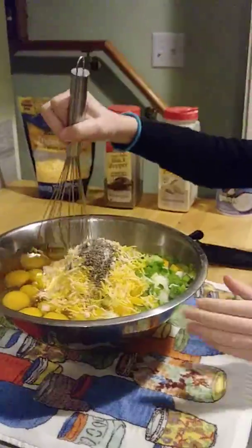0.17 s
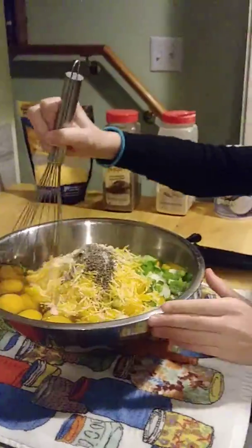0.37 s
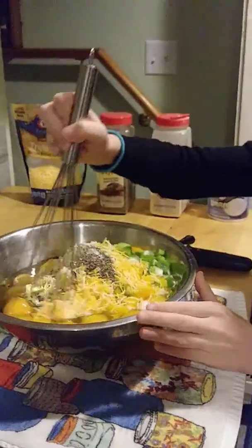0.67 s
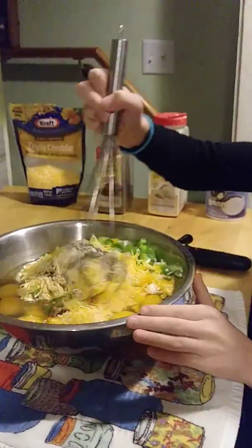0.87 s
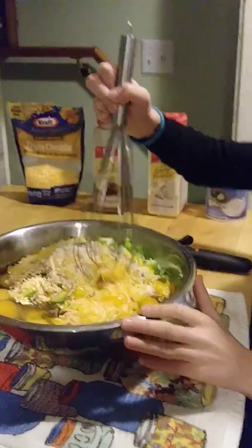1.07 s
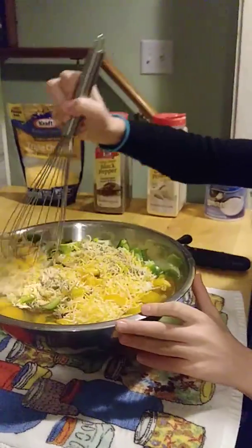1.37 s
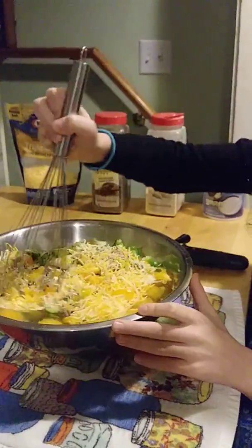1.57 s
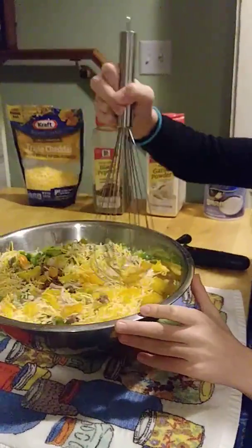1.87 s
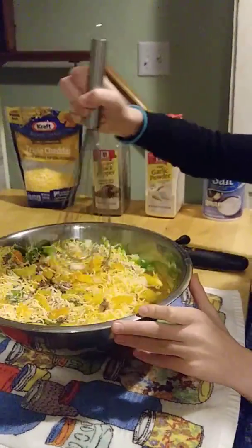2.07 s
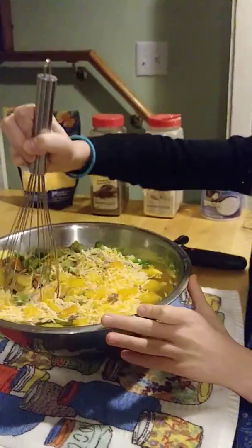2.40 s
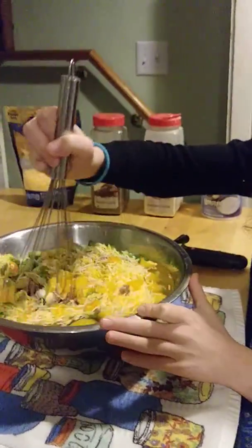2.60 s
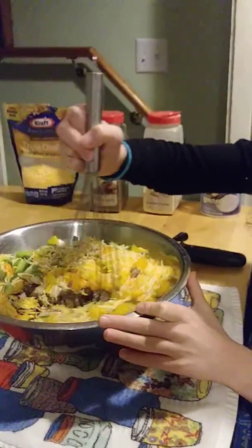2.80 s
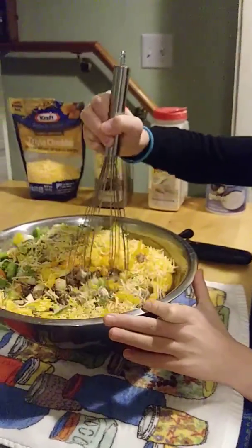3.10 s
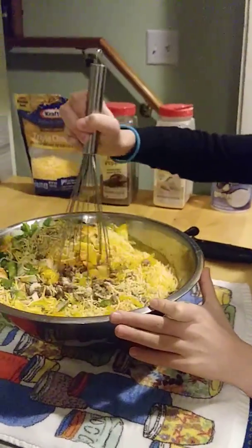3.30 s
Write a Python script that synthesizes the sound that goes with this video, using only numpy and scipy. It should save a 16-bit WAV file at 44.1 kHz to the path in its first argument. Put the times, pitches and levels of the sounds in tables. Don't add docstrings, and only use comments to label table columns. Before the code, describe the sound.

A wire whisk on a steel bowl, heard close in a small live kitchen. A metallic clatter dies within 0.2 s, then very faint wet swishes and rubs, a soft knock at 0.8 and a dull table bump at 1.54. Loud, short-ringing clanks with wire clicks hit at 2.27, 2.78 and 3.05, then crowd together from 3.27 to 3.45, flattened by limiting. Faint fridge hum beneath.

```python
import sys
import numpy as np
from scipy import signal
from scipy.fft import rfft, irfft
from scipy.io import wavfile
from scipy.ndimage import uniform_filter1d, minimum_filter1d

SR = 44100
rng = np.random.default_rng(int(sys.argv[2]) if len(sys.argv) > 2 else 0)


def wrap_up_sound(samples):
    columns = np.atleast_2d(samples).T
    tamed = np.clip(columns, -1, 1)
    steps = np.round(tamed * 32767).astype(np.int16)
    wavfile.write(sys.argv[1], SR, steps)


def ratio(d):
    e = np.asarray(d, float) / 20
    return 10 ** e


N = 152145


def evened(x):
    return x / np.sqrt(np.mean(x ** 2) + 1e-20)


def read(points, hz):
    f, value = np.transpose(points)
    return np.interp(np.log(hz + 1), np.log(f + 1), value)


def add(mix, s, sound):
    part = mix[max(round(s * SR), 0):][:len(sound)]
    part += sound[:len(part)]


def noise(size, gain_at, grain_db=0):
    grains = np.minimum(rng.exponential(1, 256), 4)
    lumps = ratio(grain_db * np.repeat(grains, 64))
    spectrum = rfft(rng.standard_normal(16384) * lumps)
    gain = gain_at(np.fft.rfftfreq(16384, 1 / SR))
    return evened(irfft(spectrum * gain))[:size]


def swell(length, rise):
    u = np.arange(0, length, 1 / SR) / length
    return np.sin(np.pi / 2 * np.minimum(u / rise, (1 - u) / (1 - rise))) ** 0.54


# (time [s], peak level [dB], spot on the bowl, time the wires land over [s])
STRIKES = [(2.27, 2.5, "far", .02), (2.276, -12.5, "far", 0.011), (2.298, -8, "far", .004),
           (2.784, 2.5, "near", .004), (2.794, -2, "near", .01), (2.819, -8.5, "edge", 0.0025),
           (3.0508, 2.5, "near", 0.0037), (3.0594, -3, "near", .01), (3.103, -3, "near", .004),
           (3.118, -13.5, "near", .006), (3.147, -14, "near", 0.0033), (3.2667, 3.5, "rim", .005),
           (3.273, -5, "rim", .01), (3.285, -1, "rim", .01), (3.3135, -2.5, "rim", 0.0033),
           (3.3185, 3.5, "edge", 0.0018), (3.329, -4, "rim", .003), (3.343, -1, "lip", 0.0044),
           (3.357, -9, "far", 0.0071), (3.368, -12.5, "near", 0.0041), (3.416, 5.5, "edge", 0.0018),
           (3.447, 0, "edge", 0.0013)]
# (frequency [Hz], level [dB], t60 [s])
FAR_WALL = [(445, -23.5, 0.11), (699.5, -10, 0.13), (810, -18, 0.078), (1030, -9, 0.059), (1213, -21, .08),
            (1812.4, -5, .16), (2020, -9, 0.11), (2137, -6, 0.092), (2560, -15.5, .1), (3440, 2.5, 0.047),
            (3967, -12, 0.064), (4300, -10.5, 0.081), (5460, -24, .08)]
NEAR_WALL = [(471, -29, 0.055), (801, -24.5, 0.086), (1220, -14.5, 0.064), (1283.7, 4, 0.051),
             (1785, -10, 0.03), (2166, -7.5, 0.13), (2592, -25, 0.16), (3400, -7, 0.079),
             (3890, -11.5, 0.14), (3937, -7, 0.21), (4110, -9.5, 0.11), (4550, -5.5, 0.06),
             (5174, -16, 0.041)]
RIM = [(669, -15, 0.23), (819, -15, 0.18), (1298, -0.5, 0.045), (1327, -7.5, 0.084), (1596, -9, 0.21),
       (2128, -5.5, 0.089), (2170, -4, 0.068), (3375, 2, 0.055), (3433, -1, .1), (4100, -1, 0.2),
       (4490, 3, 0.077)]
EDGE = [(1325, -9, 0.12), (1570, -12.5, 0.074), (2110, -1.5, 0.15), (3420, -13, 0.088), (3900, 4, 0.16),
        (4296, 10.5, 0.015), (4380, -16, 0.088), (5340, -22.5, .08)]
LIP = [(819, -16, 0.15), (1815, 5, 0.2), (2104, -7, 0.1), (2301, -10, .12), (3410, -9, .1),
       (3975, -12, 0.08)]
# (frequency [Hz], level [dB], t60 [s])
WIRES = [(6158, -14.5, 0.069), (7520, -22.5, 0.056), (8730, -28, 0.08), (11680, -32.5, 0.085),
         (13100, -35, .07), (13700, -42, 0.06), (14900, -41, .07)]
WAKES = {"far": [-9, -20, -9.5, -13.5, -5, -5, -13], "near": [-6.5, -9, -10, -8.5, -9.5, -9, -8], "rim":
         [-8.5, -4.5, -26, -8, -4, -4, -15], "edge": [-12.5, -9.5, -8.5, -5, -18.5, -9, -6.5], "lip":
         [-10.5, -20, -3.5, -11, -12, -9, -9]}
# (frequency [Hz], level [dB])
CRACK = [(60, -59), (550, -27), (700, -12.5), (1300, -6), (2650, -11), (4360, -2.5), (6000, -28.5),
         (10000, -50.5), (16000, -48)]
SPLIT, TWIN_DB = 0.0097, -7
WIRE_SPREAD_DB = 4
CONTACT_S = 0.00049
CRACK_DB, CRACK_T60_S = -1, 0.063
LATER_WIRES = 0.51


def strike(db, spot, spread_s):
    t = np.arange(SR // 3) / SR
    modes = {"far": FAR_WALL, "near": NEAR_WALL, "rim": RIM, "edge": EDGE, "lip": LIP}[spot]
    woken = [(hz, mode_db + wake_db + 6, t60) for (hz, mode_db, t60), wake_db in zip(WIRES, WAKES[spot])]
    ring = np.zeros(len(t))
    for (hz, mode_db, t60), chance in zip(modes + woken, rng.random((24, 5))):
        luck, low, high, low_phase, high_phase = chance
        twins = np.sin(2 * np.pi * (hz * (1 - SPLIT * low) * t + low_phase))
        twins += np.sin(2 * np.pi * (hz * (1 + SPLIT * high) * t + high_phase))
        decay = ratio(mode_db + WIRE_SPREAD_DB * (luck - .5) - 5.5 - 60 * t / t60)
        ring += decay * (np.sin(2 * np.pi * hz * t) + ratio(TWIN_DB) * twins)
    onset = 1 - np.exp(-(t / CONTACT_S) ** 2)
    crack_decay = onset * ratio(CRACK_DB - 60 * t / CRACK_T60_S)
    crack = noise(8192, lambda hz: ratio(read(CRACK, hz))) * crack_decay[:8192]
    landings, draw = np.zeros(2048), rng.random((5, 2))
    landings[0] = 1
    at = (draw[:, 0] * spread_s * SR).astype(int) + 20
    np.add.at(landings, at, LATER_WIRES * (.5 + draw[:, 1]))
    ring *= onset
    add(ring, 0, signal.fftconvolve(crack, landings) / 2)
    return ratio(db) * ring / 2


def shove(db):
    u = np.arange(2048) / SR / 0.0033
    return ratio(db - 18) * u ** 2 * np.exp(-u)


# (time [s], level [dB])
TICKS = [(2.2723, -31.5), (2.2757, -16), (2.2775, -20.5), (2.297, -31), (2.785, -31), (2.8195, -25),
         (3.0518, -28), (3.0588, -24.5), (3.104, -26), (3.1456, -34), (3.267, -15), (3.2725, -19.5),
         (3.3145, -20), (3.319, -9.5), (3.329, -17), (3.3435, -17.5), (3.357, -32.5), (3.368, -32),
         (3.4165, -14.5), (3.449, -14)]


def tick(db):
    u = np.arange(64) / SR / .00004
    return ratio(db) * (1 - u) * np.exp(-u)


# (time [s], peak level [dB], pitch scale [ratio])
BUMPS = [
    (.05, -53, 1.38),
    (0.702, -63, 0.29),
    (0.803, -40.5, 0.92),
    (.823, -40.5, 1.26),
    (1.537, -21, 1.007),
    (1.561, -48, 0.26),
]
# (frequency [Hz], level [dB])
BUMP = [(35, -72), (60, -97), (279, -1), (580, 5), (1050, 1), (1980, -17), (2400, -47), (3140, -22),
        (5930, -55), (7710, -83), (13000, -120)]
BUMP_RISE_S, BUMP_T60_S = 0.0029, 0.056


def bump(db, scale):
    t = np.arange(8192) / SR
    knock = noise(8192, lambda hz: ratio(read(BUMP, hz / scale)))
    return knock * np.minimum(t / BUMP_RISE_S, 1) * ratio(db - 60 * t / BUMP_T60_S)


GRAIN_DB = 2.5
# (start [s], length [s], level [dB], centre [Hz], width [octaves])
SWISHES = [(0.117, .37, -68, 4900, 0.37), (0.403, 0.074, -56, 4000, .56), (.407, 0.068, -79, 9900, .92),
           (0.504, 0.075, -55.5, 4020, 0.46), (.512, 0.074, -60.5, 910, 1.9),
           (0.584, 0.071, -63, 3830, 0.46), (.681, .03, -60.5, 3850, 0.54), (.682, 0.0081, -56, 1980, 0.27),
           (.7, 0.047, -72, 140, 0.46), (0.767, 0.16, -66, 4440, 0.45), (0.808, 0.1, -48, 426, 0.93),
           (0.821, 0.019, -45.5, 1630, 0.27), (0.941, .05, -64, 4820, .4), (.994, .085, -72, 4650, .36),
           (1.384, 0.095, -61, 4200, 0.59), (1.39, 0.083, -61.5, 740, 1.64),
           (1.473, 0.17, -74.5, 4960, .29), (1.894, .34, -76, 5240, 0.28), (2.26, 0.0083, -58, 2160, 0.63),
           (2.31, 0.073, -64, 140, 0.55), (2.444, 0.16, -55, 1290, 0.99), (2.452, .33, -63, 4940, 0.29),
           (2.777, 0.016, -40, 4540, .15), (2.778, 0.0048, -43, 1220, .6), (2.908, 0.15, -54.5, 2780, 0.74),
           (3.13, .06, -55, 2360, .54), (2.98, 0.049, -60, 483, .3)]


def swish(length, db, centre_hz, octaves):
    shape = swell(length, 0.23)

    def band(hz):
        return np.exp(-abs(np.log2((hz + 1) / centre_hz) / octaves) ** 2)

    return ratio(db) * shape * noise(len(shape), band, GRAIN_DB)


# (start [s], length [s], level [dB], mode [Hz])
RUBS = [(.06, .17, -60, 2150), (.1, .2, -71, 1750), (.244, .06, -67, 2300), (.248, .09, -69, 4080),
        (.338, .06, -65, 1740), (.358, .08, -66, 2470), (.374, .03, -69, 3360), (.58, .12, -69, 1950),
        (.7, .06, -70, 500), (.764, .05, -67, 1750), (1.011, .082, -64.5, 954), (1.016, .046, -66, 3775),
        (1.029, .094, -62, 442), (1.065, .12, -71, 1714), (1.068, .06, -74, 4260), (1.136, .11, -67.5, 377),
        (1.17, .08, -71, 750), (1.18, .06, -72, 1200), (1.19, .052, -70, 1580), (1.191, .05, -73, 2020),
        (1.229, .04, -67, 510), (1.241, .025, -74.5, 3770), (1.388, .086, -65, 2000),
        (1.915, .18, -77, 3895), (1.917, .1, -79, 2190), (1.931, .17, -76, 1800), (1.95, .17, -75, 490),
        (2.032, .2, -82, 4700), (2.076, .17, -78, 2120), (2.03, .08, -79, 1350)]
# (start [s], length [s], level [dB], mode [Hz])
AFTER_RUBS = [(2.36, .2, -66, 450), (2.402, .37, -60.5, 3440), (2.43, .07, -59, 740),
              (2.45, .32, -65, 1810), (2.47, .07, -59, 900), (2.52, .1, -57, 1020), (2.53, .08, -53, 1200),
              (2.55, .05, -56, 2150), (2.6, .17, -67, 2080), (2.62, .15, -64, 1020), (2.67, .11, -59, 1200)]
RUB_WIDTH_HZ = 60


def rub(length, db, mode_hz):
    shape = swell(length, .3)

    def resonance(hz):
        return 1 / (1 + ((hz - mode_hz) / RUB_WIDTH_HZ) ** 2)

    return ratio(db) * shape * noise(len(shape), resonance, GRAIN_DB)


# (frequency [Hz], level [dB])
CLATTER = [(60, -43.5), (300, -24), (490, -4), (1000, -10.5), (2050, 0.5), (3000, -4.5), (4600, 6.5),
           (6500, -14.5), (16000, -39.5)]
CLATTER_DB, CLATTER_T60_S = -24.5, 0.17


def clatter():
    t = np.arange(8192) / SR
    return noise(8192, lambda hz: ratio(read(CLATTER, hz))) * ratio(CLATTER_DB - 60 * t / CLATTER_T60_S)


def patchy(x):
    hz, t, z = signal.stft(x, SR, nperseg=512)
    field = rng.standard_normal((len(t), len(hz))).T
    field = uniform_filter1d(field, size=4, axis=0)
    field = evened(uniform_filter1d(field, size=10, axis=1))
    patch_db = 4 * field
    return signal.istft(z * ratio(patch_db), SR, nperseg=512)[1][:N]


# (frequency [Hz], t60 [s])
ROOM = [(150, 0.34), (600, 0.29), (2000, 0.32), (5000, 0.26), (12000, 0.19)]
ROOM_DB = -2.5


def kitchen(x):
    taps = np.zeros(SR // 2)
    at = np.arange(150, SR // 2 - 20, 20)
    taps[at + rng.integers(0, 20, len(at))] = rng.choice([-1., 1.], len(at))
    hz, t, z = signal.stft(taps, SR, nperseg=256)
    decay = ratio(-60 * t / read(ROOM, hz)[:, None])
    tail = signal.istft(z * decay, SR, nperseg=256)[1]
    return signal.fftconvolve(x, tail / np.linalg.norm(tail))[:N]


# (frequency [Hz], rms level [dB])
HUM = [(60, -89.5), (120, -92.5), (240, -77)]
# (frequency [Hz], level [dB])
AIR = [(18, -54), (60, -14.5), (250, -8.5), (800, -13), (1500, -12.5), (5000, -17), (7000, -34),
       (12800, -27.5), (13200, -40)]
AIR_DB = -78


def fridge():
    t = np.arange(N) / SR
    spectrum = rfft(rng.standard_normal(N))
    air = irfft(spectrum * ratio(read(AIR, np.fft.rfftfreq(N, 1 / SR))), N)
    hum = sum(np.sqrt(2) * ratio(db) * np.sin(2 * np.pi * hz * t) for hz, db in HUM)
    return ratio(AIR_DB) * evened(air) + hum


def scene():
    hard, soft, close = np.zeros((3, N))
    for s, db, *row in STRIKES:
        add(hard, s, strike(db, *row))
        add(close, s, shove(db))
    for s, db in TICKS:
        add(close, s, tick(db))
    for s, *row in BUMPS:
        add(hard, s, bump(*row))
    for s, *row in SWISHES:
        add(soft, s, swish(*row))
    for s, *row in RUBS + AFTER_RUBS:
        add(soft, s, rub(*row))
    add(hard, 0, clatter())
    near = hard + patchy(soft)
    wet = near + ratio(ROOM_DB) * kitchen(near) + close
    low_cut = signal.butter(2, 167, "high", fs=SR, output="sos")
    return (signal.sosfilt(low_cut, wet) + fridge())[None]


def top_cut(x):
    return signal.sosfilt(signal.butter(12, 15800, fs=SR, output="sos"), x)


def record(dry):
    low_pass = signal.firwin(255, 15800, window=("kaiser", 9), fs=SR)
    x = signal.oaconvolve(dry, low_pass[None], "same")
    span = int(0.0004 * SR) + 1
    room_left = minimum_filter1d(1 / np.maximum(abs(x), 1), size=2 * span + 1)
    return top_cut(x * uniform_filter1d(room_left, size=span))


dry = scene()
out = record(dry)
wrap_up_sound(out)
```